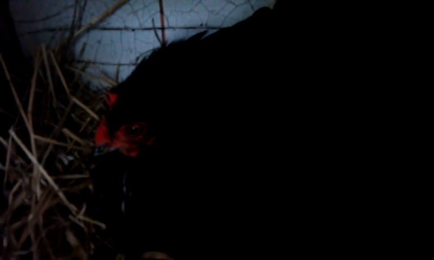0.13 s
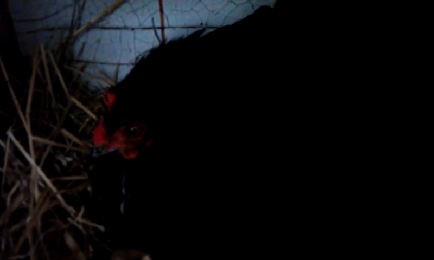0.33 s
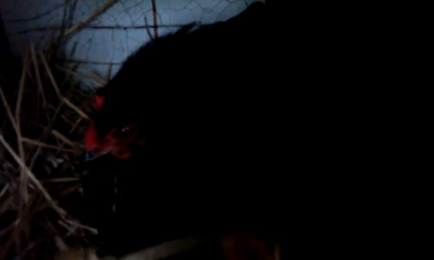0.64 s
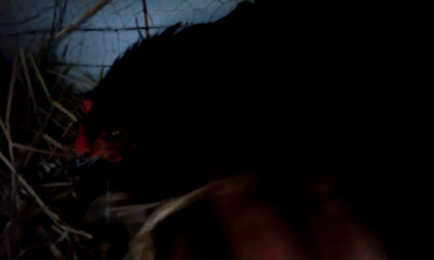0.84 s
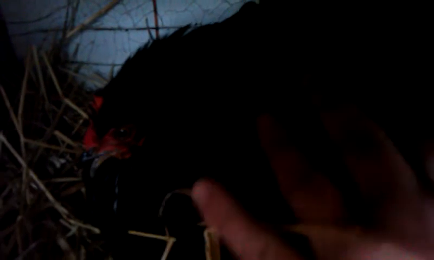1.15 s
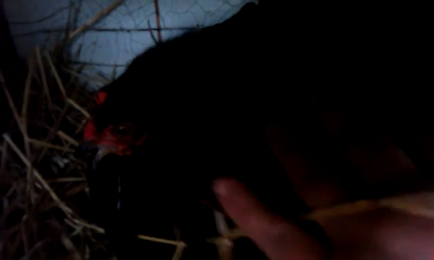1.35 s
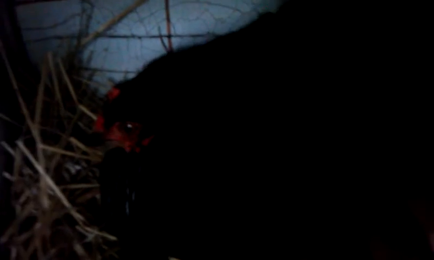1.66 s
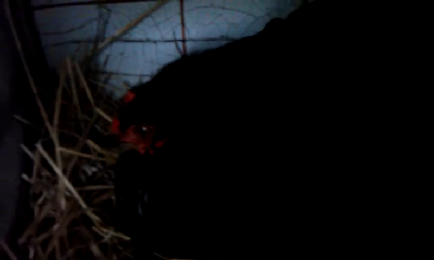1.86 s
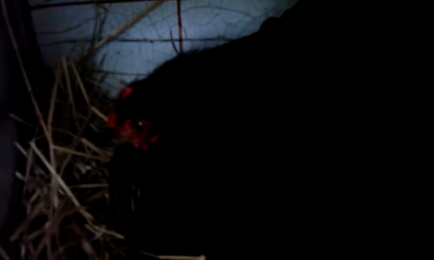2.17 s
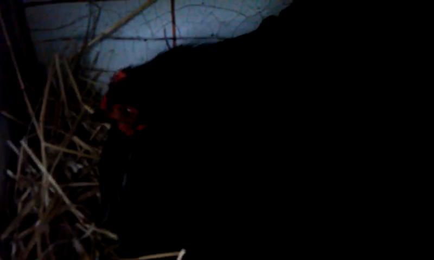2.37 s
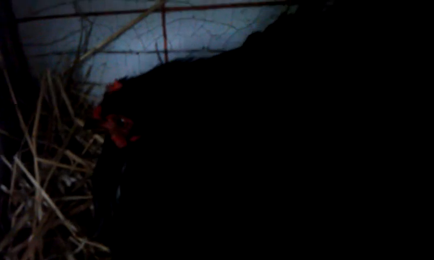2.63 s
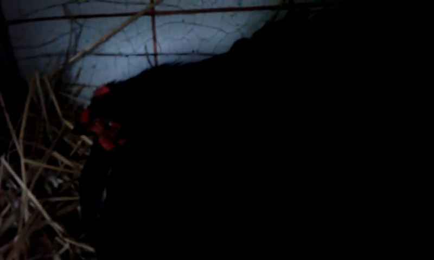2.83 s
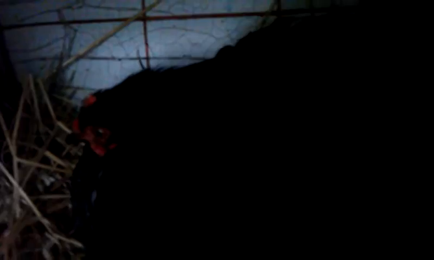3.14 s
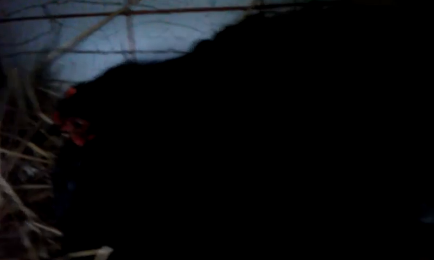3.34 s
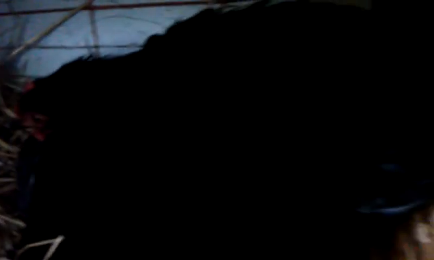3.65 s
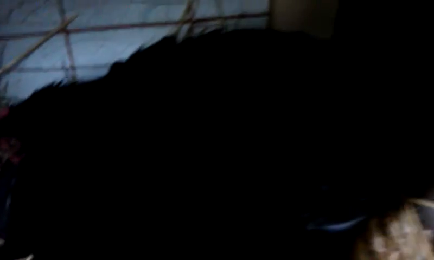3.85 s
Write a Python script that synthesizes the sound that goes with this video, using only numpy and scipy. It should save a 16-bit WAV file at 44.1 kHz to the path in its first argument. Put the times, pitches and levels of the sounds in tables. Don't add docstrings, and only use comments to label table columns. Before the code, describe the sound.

Hen in a straw nest gives a short fluttering growl, then a long raspy squawk

```python
import sys
import numpy as np
from scipy import signal
from scipy.fft import rfft, irfft
from scipy.io import wavfile
from scipy.ndimage import uniform_filter1d

SR = 44100
rng = np.random.default_rng(int(sys.argv[2]) if len(sys.argv) > 2 else 0)


def dump_mix(stems):
    frames = np.atleast_2d(stems).T
    limited = np.clip(frames, -1, 1)
    pcm = np.round(limited * 32767).astype(np.int16)
    wavfile.write(sys.argv[1], SR, pcm)


def natural_amplitude(level_db):
    exponent = np.asarray(level_db, float) / 20
    return 10 ** exponent


N = 176400
RASP_S, RASP_LENGTH_S = 1.28, 0.1


def rms_one(x):
    return x / np.sqrt(np.mean(x ** 2) + 1e-20)


def in_time(rows):
    time_s, *columns = np.transpose(rows)
    return [np.interp(np.arange(N) / SR, time_s, column) for column in columns]


def drift(rate_hz):
    r = np.exp(-2 * np.pi * rate_hz / SR)
    return rms_one(signal.lfilter([1], [1, -2 * r, r * r], rng.standard_normal(N + SR))[SR:])


def bump(centre_s, length_s):
    return np.exp(-.5 * ((np.arange(N) / SR - centre_s) / length_s) ** 2)


def butter(x, order, hz, kind="low"):
    return signal.sosfilt(signal.butter(order, hz, kind, fs=SR, output="sos"), x)


def resonance(x, hz, width_hz):
    r = np.exp(-np.pi * width_hz / SR)
    poles = [1, -2 * r * np.cos(2 * np.pi * hz / SR), r * r]
    return signal.lfilter([(1 - r * r) / 2, 0, (r * r - 1) / 2], poles, x)


def resonance_twice(x, hz, width_hz):
    return resonance(resonance(x, hz, width_hz), hz, width_hz)


def bank(x, peaks, valleys=()):
    f = np.arange(2049) * SR / 4096
    gain = sum(natural_amplitude(db) / (1 + (2 * (f - hz) / width) ** 2) ** 1.5 for hz, width, db in peaks)
    for hz, width, depth in valleys:
        gain = gain * (1 - np.clip(depth, 0, .95) / (1 + (2 * (f - hz) / width) ** 2))
    fold = np.r_[1, 2 * np.ones(2047), 1, np.zeros(2047)]
    cepstrum = irfft(np.log(gain)) * fold
    return signal.oaconvolve(x, irfft(np.exp(rfft(cepstrum)))[:1024])[:N]


# pitch_hz, density_db_per_hz
YARD_COLOUR = [(30, -54), (100, -15.5), (300, -16.5), (620, -9.5), (1400, -2), (3200, -14.5), (4800, -31),
               (15600, -24.5)]
# pitch_hz, wander_db, level_db
MOTOR_HUM = [(95, 3, -70), (139, 1.2, -62)]


def yard():
    t = np.arange(N) / SR
    noise, level_db = 0, -45
    edges_hz = 30 * 2 ** np.arange(0, 9.6, .5)
    white = rng.standard_normal((2, N))
    colour_hz, colour_db = np.transpose(YARD_COLOUR)
    for k, (low, high) in enumerate(zip(edges_hz, edges_hz[1:])):
        band_db = np.interp(np.log(low * high) / 2, np.log(colour_hz), colour_db)
        noise = noise + natural_amplitude(band_db) * butter(white[k % 2], 2, [low, high], "band")
    hum = 0
    for hz, wander_db, db in MOTOR_HUM:
        strength = natural_amplitude(db + 3 + wander_db * drift(5))
        hum = hum + strength * np.sin(2 * np.pi * hz * t + .4 * drift(3))
    return natural_amplitude(level_db) * rms_one(noise) + hum


# centre_s, length_s, level_db
INSECT_SWELLS = [
    (2.91, 0.0987, -60.5),
    (3.778, 0.13, -57),
]


def insect():
    band = rms_one(resonance_twice(rng.standard_normal(N), hz=11500, width_hz=1700))
    return band * sum(natural_amplitude(db) * bump(s, length) for s, length, db in INSECT_SWELLS)


# centre_s, length_s, pitch_hz, level_db
FAR_CLUCKS = [(2.532, 0.016, 430, -49), (3.0, 0.06, 360, -58.5), (2.41, 0.032, 590, -50.5),
              (2.873, 0.031, 607, -57), (2.966, 0.013, 610, -50), (3.344, 0.087, 630, -53.5),
              (3.724, 0.02, 640, -45.5), (3.622, 0.043, 576, -58)]


def far_hens():
    t = np.arange(N) / SR
    out = 0
    for s, length, hz, db in FAR_CLUCKS:
        phase = 2 * np.pi * hz * (t + 0.24 * (t - s) ** 2)
        out = out + natural_amplitude(db) * bump(s, length) * (np.sin(phase) + 0.69 * np.sin(2 * phase))
    return out


# centre_s, length_s, level_db, pitch_hz
RUSTLES = [(0.082, 0.022, -55, 13700), (0.142, 0.011, -51.5, 11800), (0.316, 0.01, -40.5, 12800),
           (0.75, 0.046, -48, 12960), (0.87, 0.012, -44.5, 8860), (2.842, 0.16, -59.5, 7600),
           (2.88, 0.089, -51.5, 2740), (0.257, 0.017, -49.5, 6040), (1.657, 0.028, -48.5, 5240),
           (0.868, 0.014, -41, 12730), (1.698, 0.22, -50.5, 6840)]


def straw():
    grains = rng.standard_normal(N) * natural_amplitude(4.3 * drift(180))
    out = 0
    for s, length, db, hz in RUSTLES:
        out = out + natural_amplitude(db) * bump(s, length) * rms_one(resonance_twice(grains, hz, .5 * hz))
    return out


# start_s, level_db, pitch_hz
STALK_SNAPS = [
    (0.867, -23.5, 7600),
    (.8662, -30, 12570),
]


def snaps():
    out = 0
    for s, db, hz in STALK_SNAPS:
        click = np.full(N, 1e-18)
        click[int(s * SR)] = 8 * natural_amplitude(db)
        out = out + resonance_twice(click, hz, .7 * hz)
    return out


# crest_s, peak_db
RASP_TICKS = [(1.133, -32.5), (1.153, -33), (1.174, -27.5), (1.186, -35.5), (1.207, -41), (1.215, -28),
              (1.232, -23), (1.248, -43), (1.255, -34), (1.266, -35.5), (1.2748, -30.5), (1.289, -48.5),
              (1.315, -25), (1.327, -33.5), (1.335, -37), (1.3528, -26.5), (1.3734, -25), (1.387, -32),
              (1.397, -31.5), (1.4144, -29.5), (1.6243, -34), (1.6464, -41), (1.6677, -33)]
# pitch_hz, width_hz, level_db
RASP_COLOUR = [(4510, 820, 14), (5880, 3100, -7), (7600, 3000, -2.5), (10770, 2300, -5.5)]


def ticks():
    t = np.arange(N) / SR
    rise_s, fall_s, late_s, rasp_db = 0.002, 0.0014, 0.002, -54.5
    shape = natural_amplitude(rasp_db) * bump(RASP_S, RASP_LENGTH_S)
    for s, db in RASP_TICKS:
        since_s = t - s - late_s
        shape = shape + natural_amplitude(db - 2.5) * np.exp(np.minimum(since_s / rise_s, -since_s / fall_s))
    return shape * rms_one(bank(rng.standard_normal(N), RASP_COLOUR))


# time_s, pitch_lead_cycles, loudness_depth_db, fundamental_lift_db, pitch_dip_narrowness
FLUTTER = [(0, -0.39, 2.5, 7.5, 3.96), (.85, -0.42, 1.5, 7.5, 4.11), (.92, -0.23, 7, -2, 3.83),
           (1.35, -0.2, 2.5, -8, 4.32), (1.47, 0.16, 3, -10.5, 4.0), (1.8, 0.1143, 5.5, -7.5, 3.05),
           (1.98, 0.08, 3.5, -5, 1.6), (2.15, 0.059, -1.5, 5.5, 1.98), (2.55, 0.091, -1, 11.5, 2.12)]


def throat_source(call, beats):
    pitch_hz, _, rough, swing, weak_db = in_time(call)
    lead, flutter_db, lift_db, narrow = in_time(FLUTTER)
    beat = .08 + in_time(beats)[0] + 0.0505 * drift(25.68)
    strong_weak = np.cos(np.pi * beat)

    depth = swing * (1 + .04 * weak_db * (strong_weak - 1)) * (1 + 0.2531 * drift(20))
    dip = np.abs(np.sin(np.pi * (beat + lead))) ** narrow
    hz = pitch_hz * np.exp(-depth * dip + 0.2483 * rough * drift(246.6))
    phase = 2 * np.pi * np.cumsum(hz) / SR
    tilt = .35
    pulses = rms_one(sum(k ** -tilt * np.cos(k * phase) * (k * hz < 9000) for k in range(1, 19)))
    pulses = pulses + (natural_amplitude(lift_db) - 1) * .5 * np.cos(phase)

    breath_db, breath_cut_hz = 4.5, 2650
    air = rms_one(butter(rng.standard_normal(N), 2, breath_cut_hz))
    breath = natural_amplitude(breath_db) * rough * air * (1 + np.cos(phase))

    squareness, uneven_db, double_beat_db = 2.46, 4, 5.5
    gate_db = flutter_db * np.tanh(squareness * np.cos(2 * np.pi * beat)) + weak_db * strong_weak
    gate_db = gate_db + uneven_db * rough * drift(73)
    rasp = bump(RASP_S + 0.034, RASP_LENGTH_S)
    gate = natural_amplitude(gate_db + double_beat_db * rasp * np.cos(4 * np.pi * beat))
    return (pulses + breath) * gate, gate


# pitch_hz, width_hz, level_db
THROAT_PEAKS = [(257, 404, -8.5), (685, 315, -7), (974, 232, 5.5), (1492.4, 533, 10), (1930, 490, 0.5),
                (3930, 1600, -23.5), (4117, 370, -15)]
SHUT_PEAKS = [(2817, 435, -2.5)]
OPEN_PEAKS = [(2201, 253, 3.3)]
TOP_PEAKS = [(7310, 900, -27), (6380, 1100, -26.5)]
# pitch_hz, width_hz, depth_0_to_1
THROAT_VALLEYS = [(944, 58, 0.7), (2710, 93, 0.14), (2970, 280, .9), (3350, 83, 0.8), (4040, 50, 1)]


def throat_and_beak(source, gate, call_start_s):
    t = np.arange(N) / SR
    opens_s, takes_s, shut_fades, cut_hz = 1.66, 0.05, 0.9, 5070
    opening = (1 + np.tanh((t - opens_s) / takes_s)) / 2
    opening = opening * (t < call_start_s + 2) * (call_start_s < opens_s)
    voice = bank(source, THROAT_PEAKS) + opening * bank(source, OPEN_PEAKS)
    voice = voice + (1 - shut_fades * opening) * bank(source, SHUT_PEAKS)
    voice = butter(voice, 8, cut_hz) + bank(gate * rng.standard_normal(N), TOP_PEAKS)
    voice = butter(voice, 2, 220, "high")
    return bank(voice, [(0, 1e7, 0)], THROAT_VALLEYS)


# centre_s, level_db
BEAT_STRESS = [(.018, 2), (.038, -5.5), (.06, 2), (.078, -6), (.101, 1.5), (0.131, -2.5), (.142, 1.5),
               (0.172, -2.5), (0.29, -5), (.3, 3), (0.314, -3), (.625, 2.5), (.665, 3), (0.687, -5),
               (.707, 2.5), (.748, 1), (.767, -4), (.791, 1.5), (0.811, -3.5), (.835, 2), (0.855, -3),
               (.893, 2.5), (0.936, -6.5), (.975, -8.5), (1.012, -1.5), (1.032, -4.5), (1.073, -1.5),
               (1.113, -1), (1.197, -1), (1.25, -2.5), (1.29, -1), (1.317, 3.5), (1.375, 4.5),
               (1.441, -0.5), (1.544, -5.5), (1.585, 2.5), (1.667, 0), (1.687, 1), (1.705, -0.5),
               (1.766, -1), (1.843, -0.5), (1.874, -1.5), (1.913, 0.5), (2.0, 2), (2.12, -2), (2.138, 1)]


def even_and_stress(voice):
    t = np.arange(N) / SR
    power = uniform_filter1d(uniform_filter1d(voice ** 2, size=2600), size=2600)
    voice = voice / np.sqrt(power)
    ceiling, growl_share, from_s = 1.75, .55, 1.08
    push = np.interp(t, [from_s - .1, from_s + 0.15], [growl_share, 1])
    height = np.abs(signal.hilbert(voice)) / ceiling * push
    stress_db = sum(db * bump(s, 0.0073) for s, db in BEAT_STRESS)
    voice = voice * (1 + height ** 4) ** -.25 * natural_amplitude(stress_db)
    return butter(voice, 2, 170, "high")


def puff(level_db):
    puff_db, puff_hz = -61.5, 70.5
    edges_hz = [.5 * puff_hz, 2 * puff_hz]
    air = rms_one(butter(rng.standard_normal(N), 1, edges_hz, "band"))
    lasts = np.arange(N) / SR < RASP_S + RASP_LENGTH_S
    return natural_amplitude(puff_db + level_db + 17 + 4.7 * drift(15)) * air * lasts


# time_s, pitch_hz, level_db, roughness_0_to_1, pitch_swing_0_to_1, strong_weak_db
SHORT_GROWL = [(0, 722, -22, 0.17, 0.64, 1.5), (.15, 719.6, -23, 0.18, 0.44, 4),
               (.22, 691.8, -20, 0.18, 0.32, -4.5), (.278, 663.2, -19.5, 0.11, 0.44, 0),
               (.29, 550.3, -26.5, 0.21, 0.38, -1.5), (.297, 565.5, -15.5, 0, 0.5, -2),
               (.306, 520.5, -32, 0.2, .3, -5.5), (.312, 507.5, -23, 0.56, 0.47, -1),
               (.345, 455, -41, 0.05, 0.25, 4)]
LONG_SQUAWK = [(.572, 248.7, -40.5, 0.045, .1, 8.5), (.605, 718.3, -29.5, 0.18, 0.42, 6.5),
               (.67, 697.4, -22.5, 0.27, 0.58, 2.5), (.85, 699.7, -17, 0.28, 0.65, 6),
               (.9, 718.5, -17, 0.12, 0.17, -1.5), (1.79, 800.4, -14.5, 0.056, .28, 2.5),
               (1.97, 735, -16.5, 0.07, .48, 1), (2.045, 469.3, -20, 0.11, 0.3, -1),
               (2.148, 254.6, -16.5, 0.14, 0.098, -4)]
SHORT_CLUCK = [
    (2.549, 320.7, -41, 0.099, 0.023, 0.0055),
    (2.553, 312.5, -22.5, 0.15, 0, 0.015),
    (2.563, 270, -26, 0.22, 0, 0),
    (2.569, 250, -54, 0.049, 0.015, 0),
]
# time_s, beats_so_far
SHORT_BEATS = [(-.023, -2), (.101, 4), (.182, 8), (.247, 11), (.299, 13), (.34, 15)]
LONG_BEATS = [(.584, -2), (.706, 4), (.876, 12), (.894, 13), (1.132, 25), (1.375, 37), (1.465, 41),
              (1.803, 58), (1.943, 65), (2.15, 75)]


def hen():
    t = np.arange(N) / SR
    release_s, out = 0.001, 0
    for call, beats in [(SHORT_GROWL, SHORT_BEATS), (LONG_SQUAWK, LONG_BEATS), (SHORT_CLUCK, LONG_BEATS)]:
        start_s, end_s = call[0][0], call[-1][0]
        level_db = in_time(call)[1]
        source, gate = throat_source(call, beats)
        voice = even_and_stress(throat_and_beak(source, gate, start_s))
        on = (t > start_s) * np.exp(-np.maximum(t - end_s, 0) / release_s)
        out = out + on * (natural_amplitude(level_db) * voice + puff(level_db))
    return out


def nest_box(x):
    size_s, echo_db = .012, -16
    echoes = np.zeros(int(3 * size_s * SR))
    echoes[0] = 1
    echoes[int(.37 * size_s * SR)] = natural_amplitude(echo_db)
    echoes[int(size_s * SR)] = -natural_amplitude(echo_db - 3)
    echoes[int(2.3 * size_s * SR)] = natural_amplitude(echo_db - 9)
    return signal.fftconvolve(x, echoes)[:N]


def scene():
    background = yard() + insect() + far_hens()
    return (background + straw() + snaps() + nest_box(hen() + ticks()))[None]


def drop_weak_bands(x):
    low_hz, high_hz, low_db, high_db = 350, 4640, -40.5, -43
    hz, _, spec = signal.stft(x, SR, window="hann", nperseg=2048, noverlap=1536)
    power = np.abs(spec) ** 2
    band = np.where(hz < 1000, hz // 130, 8 + (hz - 100) // 575).astype(int)
    band_power = np.array([power[band == k].sum(axis=0) + 1e-20 for k in range(band.max() + 1)])
    share_db = 10 * np.log10(band_power[band] / power.sum(axis=0))
    limit_db = np.where(hz < low_hz, low_db, np.where(hz > high_hz, high_db, -200))
    keep = np.clip((share_db - limit_db[:, None]) / 2 + .5, 0, 1)
    return signal.istft(spec * keep, SR, window="hann", nperseg=2048, noverlap=1536)[1][:N]


def gain_control(x):
    start_db, ratio, rise_s, fall_s = -29, 0.52, 1, 0.4
    level_db = 10 * np.log10(uniform_filter1d(x ** 2, size=441) + 1e-12)
    over_db = np.maximum(level_db - start_db, 0)
    rise, fall = np.exp(-1 / (rise_s * SR)), np.exp(-1 / (fall_s * SR))
    built_db = signal.lfilter([1 - rise], [1, -rise], over_db)
    recent_db = signal.lfilter([1 - fall], [1, -fall], over_db)
    return x * natural_amplitude(-ratio * np.minimum(built_db, recent_db))


def band_limit(x):
    return signal.sosfilt(signal.butter(12, 15750, fs=SR, output="sos"), x)


def record(dry):
    mix = drop_weak_bands(gain_control(dry[0]))[None]
    return band_limit(mix)


dry = scene()
out = record(dry)
dump_mix(out)
```